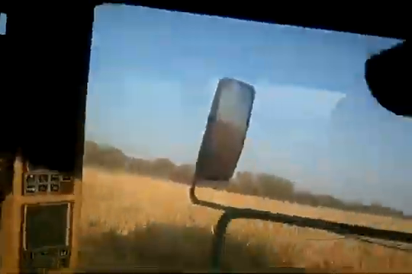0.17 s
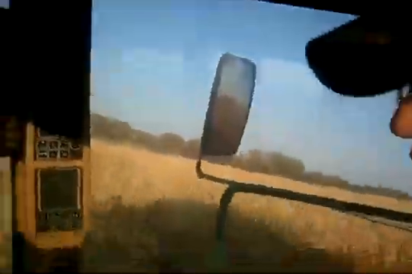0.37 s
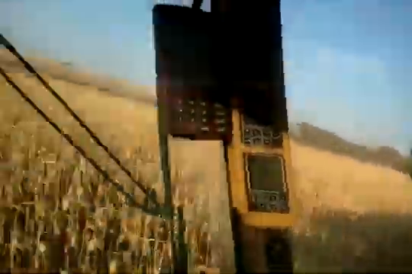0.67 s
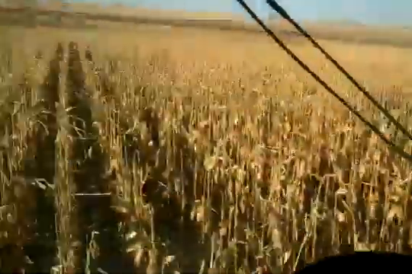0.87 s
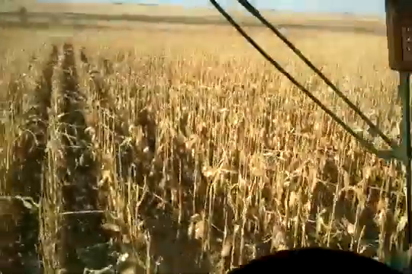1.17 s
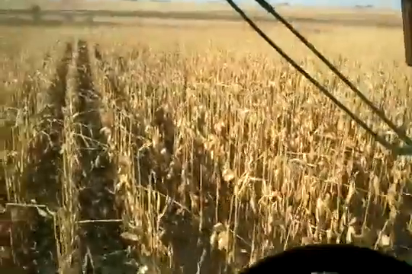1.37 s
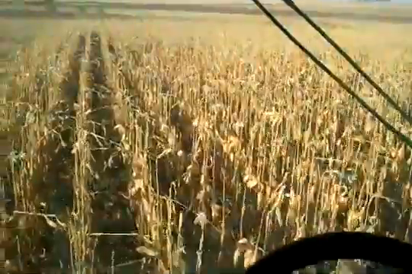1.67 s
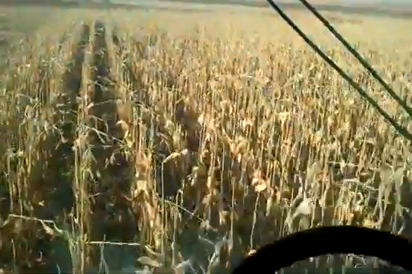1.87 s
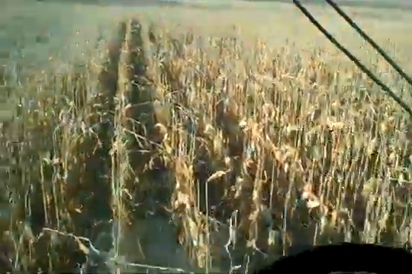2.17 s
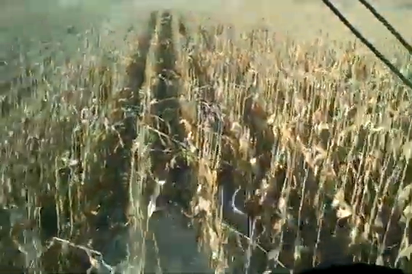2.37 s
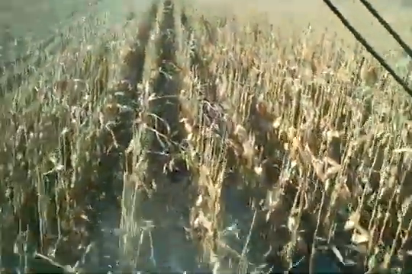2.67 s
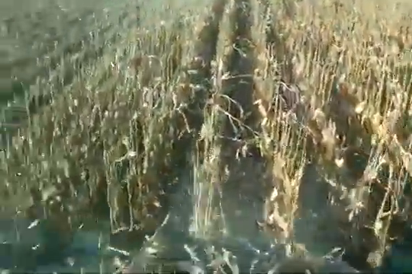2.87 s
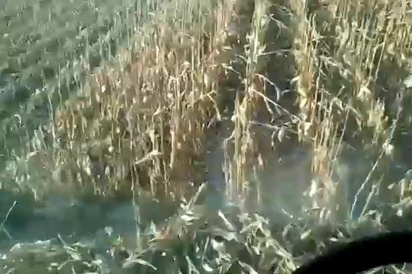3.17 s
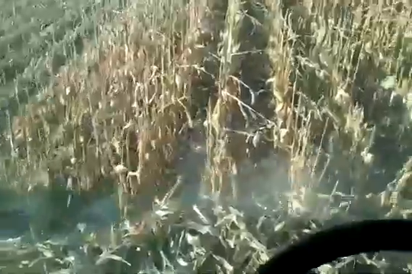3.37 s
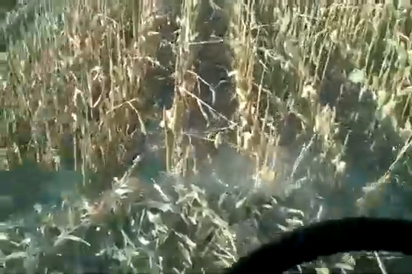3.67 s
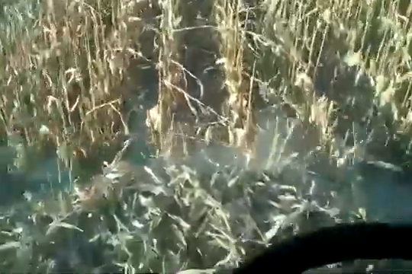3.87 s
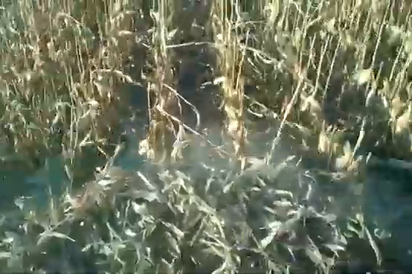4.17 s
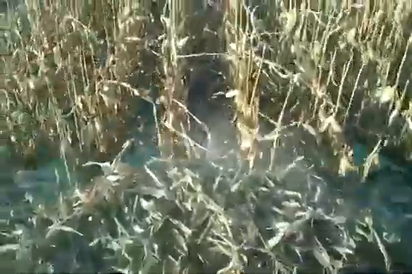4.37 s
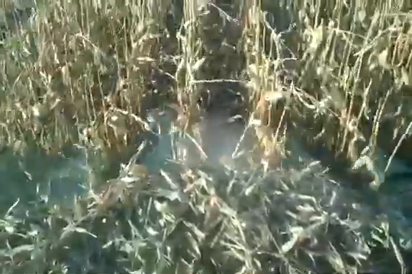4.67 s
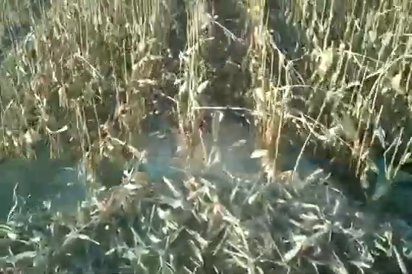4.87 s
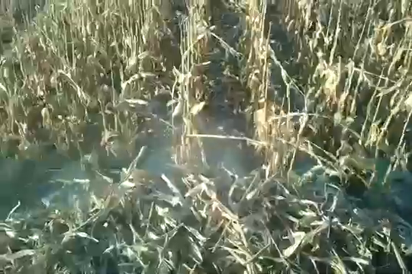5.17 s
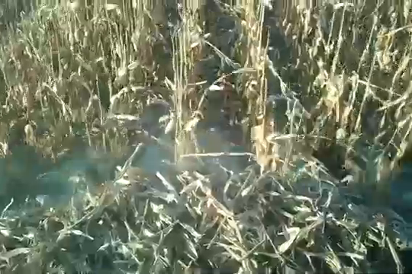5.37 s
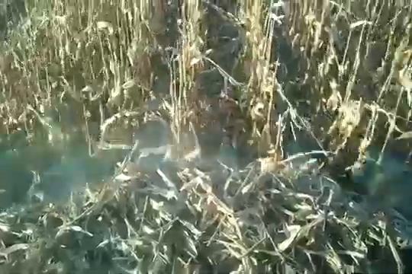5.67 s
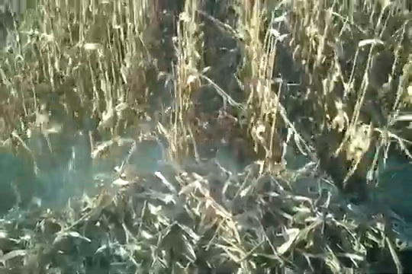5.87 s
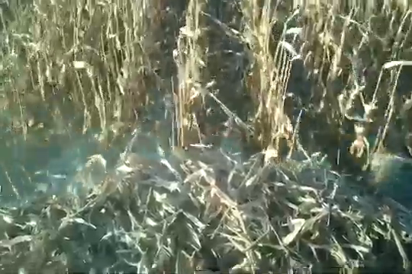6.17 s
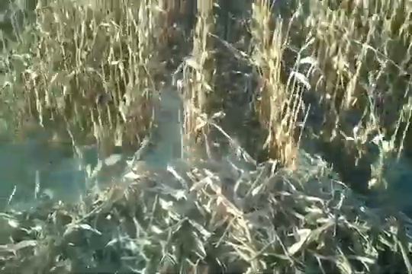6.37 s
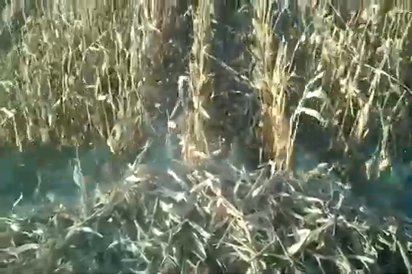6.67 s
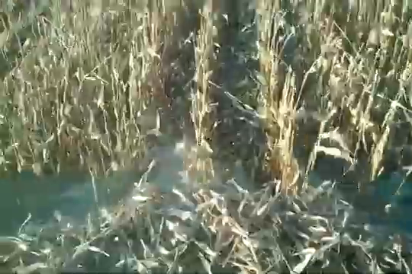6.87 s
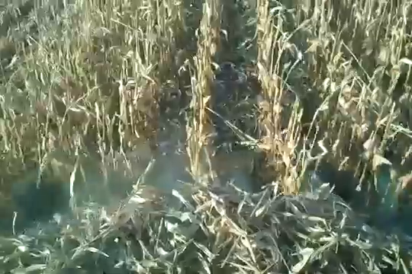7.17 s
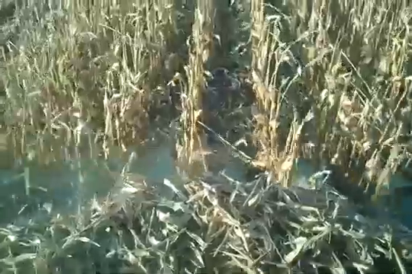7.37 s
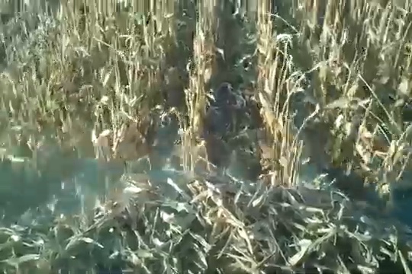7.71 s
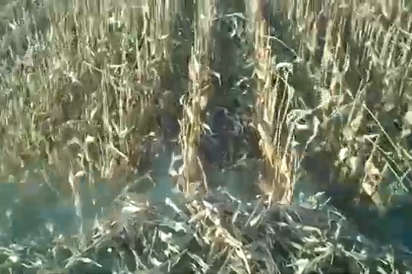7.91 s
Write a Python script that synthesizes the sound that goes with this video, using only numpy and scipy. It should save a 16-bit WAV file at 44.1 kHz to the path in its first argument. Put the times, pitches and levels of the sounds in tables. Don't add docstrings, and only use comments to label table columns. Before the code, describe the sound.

Continuous loud machine noise in a closed harvester cab: low panel boom, rough engine hum near 100 hertz, a mid hum around 500 hertz and a thin higher whine. Over it lies a grainy rush of dry stalks. The whine eases after the first second as the small camera tips to the header; later, strong low shakes pulse and briefly press the rest down.

```python
import sys
import numpy as np
from scipy import signal
from scipy.io import wavfile
from scipy.ndimage import uniform_filter1d, minimum_filter1d

SR = 44100
rng = np.random.default_rng(int(sys.argv[2]) if len(sys.argv) > 2 else 0)


def master_out(mix):
    frames = np.transpose(np.atleast_2d(mix))
    ceiling = np.clip(frames, -1, 1)
    pcm = np.round(ceiling * 32767).astype(np.int16)
    wavfile.write(sys.argv[1], SR, pcm)


def decibels_to_gain(level_db):
    exponent = np.asarray(level_db, float) / 20
    return 10 ** exponent


N = 354652

# (time [s], frequency [Hz])
CRANK = [(0.0, 515.7), (.7, 515.9), (1.2, 515.4), (2.4, 516.8), (4.5, 516.8), (5.2, 516.3), (6.2, 517.0),
         (8.04, 516.8)]
LINES_DUCK = 0.21


def engine(t):
    # (side window [dB], across cab [dB], header [dB], held low [dB])
    top_order_db = (-29.5, -26, -31.5, -33.5)
    # (multiple of crank speed [-], side window level [dB], crop level [dB])
    orders = [(2, -32, -31), (10, -36, -39), (15, -36, -38), (20, -42, -50), (25, -45, -45), (80, -50, -50)]
    rotor_hz, rotor_db, rotor_give = 25.7, -21, 0.54
    top_hz = along(CRANK, t)[0]
    crank_hz = top_hz / 16
    facing = facing_crop(t)
    top_db = gazed(top_order_db, t) + ducked(LINES_DUCK, t)
    out = tone(top_hz, top_db, t, rough_db=1.6, rough_hz=20)
    out += tone(crank_hz, shake_db(t) + 1.6, t, rough_db=0.3, rough_hz=5.8)
    out += tone(rotor_hz, rotor_db + ducked(rotor_give, t), t, rough_db=3.0, rough_hz=5.1)
    for order, side_db, crop_db in orders:
        level_db = side_db + facing * (crop_db - side_db)
        out += tone(order * crank_hz, level_db, t, rough_db=2.5, rough_hz=8)
    return out


def firing(t):
    # (centre [Hz], width [Hz], side window level [dB], crop level [dB])
    firing_bands = [(104.84, 5, -3, 0.5), (117.5, 4.7, -1, -1.5)]
    # (middle [s], half length [s], rise [dB])
    throbs = [(1.3, 0.11, 3.5), (1.62, .1, 5), (2.08, .1, 5), (3.45, .17, 6), (4.05, .17, 5),
              (5.25, 0.097, 4.5), (6.2, .15, 3.5), (6.5, .08, 3), (7.0, .06, 4.5), (7.25, .07, 5)]
    level_db = gazed((-21, -20, -22, -24.5), t) + bells(throbs, t) - 3.0
    return decibels_to_gain(level_db) * resonances(firing_bands, t)


def whines(t):
    # (full-speed pitch [Hz], share of crank sag [-], then level per gaze: side window [dB],
    # across cab [dB], header [dB], held low [dB])
    teeth = [
        (393.3, 1.0, -27.5, -24, -34, -37),
        (1438, 2.5, -33.5, -31, -34, -37),
        (2311, 0.299, -40.5, -44.5, -35, -38.5),
    ]
    # (middle [s], half length [s], change [dB])
    pump_sags = [(0.119, .15, -5), (.75, .22, -7.5), (1.6, .07, -6.5), (2.1, .14, -8), (3.55, .1, -4.5)]
    pump, full_speed_hz, jitter_share = 1, 516.8, 0.0005
    sag = along(CRANK, t)[0] / full_speed_hz - 1
    out = 0
    for k, (hz, slip, *db) in enumerate(teeth):
        jitter = jitter_share * slip * np.interp(t, t[::64], wander(12, t[::64]))
        level_db = gazed(db, t) + ducked(LINES_DUCK, t)
        if k == pump:
            level_db = level_db + bells(pump_sags, t)
        out = out + tone(hz * (1 + slip * sag + jitter), level_db, t, rough_db=2.0, rough_hz=29.8)
    return out


def panel_hums(t):
    # (centre [Hz], width [Hz], side window level [dB], crop level [dB])
    hum_bands = [(47, 6, -27, -27), (148, 4, -32, -40), (236, 22, -38, -28), (248, 2, -34, -33),
                 (273, 8, -34, -40), (401, 16, -31, -37), (409, 1.5, -32, -37), (495, 20, -38, -36),
                 (615, 1.5, -52, -43), (845, 30, -41, -39), (1053, 2, -54, -46), (1155, 2, -54, -46),
                 (2256, 3, -49, -54), (2487, 3, -57, -49), (2641.5, 1.5, -45, -46)]
    return resonances(hum_bands, t)


def boom(t):
    # (frequency [Hz], level per Hz [dB])
    boom_spectra = [
        [(14, -31.5), (23, -0.5), (75, -7), (123, -6), (195, -13), (338, -19), (392, -18), (448, -21),
         (512, -17), (577, -26), (800, -34), (1040, -57), (1760, -120)],
        [(14, -26), (23, 1.5), (54, -6.5), (163, -14), (240, -13.5), (343, -20), (392, -19.5), (442, -21.5),
         (505, -22), (640, -33.5), (800, -32.5), (1040, -50), (1760, -120)],
    ]
    noise = rng.standard_normal(N)
    drumming = coloured(noise, boom_spectra, size=4096, patchy_db=0.34, patch_hz=60, patch_s=0.13)
    drumming = signal.lfilter(*signal.iirnotch(32.3, 1.8, SR), drumming)
    level_db = gazed((-19.5, -18.5, -18.5, -19), t) + ducked(0.31, t) + 5.5
    return decibels_to_gain(level_db) * drumming


def rush(t):
    # (frequency [Hz], level per Hz [dB])
    rush_spectra = [
        [(320, -39.5), (550, -5.5), (846, -4.5), (922, -7), (1130, -4), (1260, -8), (1480, -7.5), (1860, -12),
         (2680, -10.5), (5820, -19), (7220, -32), (9390, -55.5), (15900, -120)],
        [(320, -38), (550, -6), (668, -0.5), (728, -9), (903, -1.5), (1140, -5.5), (1470, -5.5), (1510, -4.5),
         (2140, -13), (3470, -11.5), (6280, -20), (7220, -33.5), (9390, -67.5), (15900, -120)],
        [(320, -45.5), (550, -16), (626, 0), (760, -12.5), (828, -3.5), (1360, -9.5), (1480, -6.5),
         (2180, -13.5), (2380, -15), (2860, -23), (4210, -13), (7220, -34.5), (9390, -59.5), (15900, -120)],
        [(320, -36.5), (550, -0.5), (768, -5.5), (828, -2), (932, -4.5), (1220, -4), (1390, -2), (2160, -4.5),
         (2380, -5.5), (2890, -13.5), (3550, -19.5), (5760, -13), (6210, -16), (7220, -39), (9390, -76),
         (15900, -120)],
    ]
    beat_hz, snaps_per_s = 6.58, 1500
    snap_sizes = decibels_to_gain(3.6 * np.minimum(rng.exponential(1, N), 5))
    snaps = snap_sizes * (rng.random(N) < snaps_per_s / SR) * rng.choice([-1, 1], N)
    drive = 0.94 * rng.standard_normal(N) + 0.4 * evened(snaps)
    beat_db = -0.4 * np.cos(2 * np.pi * beat_hz * t)
    beat_db += 0.5 * np.interp(t, t[::64], wander(40, t[::64]))
    level_db = gazed((-31.5, -33, -31, -31.5), t) + ducked(0.28, t) + 7.5
    level_db = level_db + 1.96 * facing_crop(t) + beat_db
    return decibels_to_gain(level_db) * coloured(drive, rush_spectra, size=512, patchy_db=0.5, patch_hz=500, patch_s=0.047)


def shake_db(t):
    # (middle [s], half length [s], top level [dB])
    surges = [(.31, 0.26, -20.5), (.75, 0.058, -17.5), (1.06, 0.16, -22), (1.57, 0.13, -16),
              (2.0, 0.08, -14.5), (2.3, 0.04, -13.5), (2.68, 0.32, -17.5), (3.26, 0.22, -15.5),
              (3.93, 0.11, -16.5), (4.28, 0.083, -11.5), (4.65, .17, -17), (5.2, 0.27, -22.5),
              (5.78, .24, -15), (6.35, 0.14, -11), (7.03, 0.13, -10.5), (7.36, 0.12, -11), (7.8, .11, -16)]
    lull_db = -30
    powers = [(mid, half, decibels_to_gain(2 * db)) for mid, half, db in surges]
    return 10 * np.log10(decibels_to_gain(2 * lull_db) + bells(powers, t))


def ducked(share, t):
    shake_mean_db = -17
    return -share * (shake_db(t) - shake_mean_db)


def facing_crop(t):
    # (time [s], pose: 0 side window, 1 windscreen, 2 tipping down, 3 crop [-])
    poses = [(0, 0), (.8, -0.8), (1.05, 1.0), (2.15, 0.64), (2.35, 2), (2.75, 2.3), (3.0, 2.9), (4.0, 3.3)]
    return (along(poses, t)[0] / 3).clip(0, 1)


def gazed(db, t):
    # (time [s], gaze: 0 side window, 1 across cab, 2 tipped to header, 3 held low [-])
    gazes = [(0, 0), (.7, 0.7), (1.2, 1.0), (2.2, 1.03), (3.8, 1.45), (4.6, 1.8), (6.3, 2.5), (7.4, 3.0),
             (8.04, 3)]
    return np.interp(along(gazes, t)[0], np.arange(len(db)), db)


def resonances(bands, t):
    facing, out = facing_crop(t), 0
    for hz, width_hz, side_db, crop_db in bands:
        r = np.exp(-np.pi * width_hz / SR)
        noise = rng.standard_normal(N) + 1j * rng.standard_normal(N)
        slow = signal.lfilter([1], [1, -2 * r, r * r], noise)
        ringing = evened((slow * np.exp(2j * np.pi * hz * t)).real)
        out = out + decibels_to_gain(side_db + facing * (crop_db - side_db)) * ringing
    return out


def tone(hz, db, t, rough_db, rough_hz):
    waver = np.interp(t, t[::64], wander(rough_hz, t[::64]))
    phase = 2 * np.pi * np.cumsum(hz * np.ones(N)) / SR
    return np.sqrt(2) * decibels_to_gain(db + rough_db * waver) * np.sin(phase)


def coloured(x, spectra, size, patchy_db, patch_hz, patch_s):
    overlap = size * 3 // 4
    hz, t, z = signal.stft(x, SR, nperseg=size, noverlap=overlap)
    gain = decibels_to_gain(posed(spectra, hz, t))
    patches = rng.standard_normal(z.T.shape).T
    patches = uniform_filter1d(patches, max(round(patch_hz / hz[1]), 1), axis=0)
    patches = evened(uniform_filter1d(patches, max(round(patch_s / t[1]), 1), axis=1))
    gain = gain / np.linalg.norm(gain, axis=0) * decibels_to_gain(patchy_db * patches)
    return evened(signal.istft(z * gain, SR, nperseg=size, noverlap=overlap)[1][:N])


def posed(spectra, hz, t):
    place = facing_crop(t) * (len(spectra) - 1)
    out = 0
    for k, spectrum in enumerate(spectra):
        knot_hz, knot_db = np.transpose(spectrum)
        shape_db = np.interp(np.log(hz + 1), np.log(knot_hz + 1), knot_db)
        out = out + np.outer(shape_db, (1 - abs(place - k)).clip(0))
    return out


def bells(rows, t):
    s = t[::64]
    return np.interp(t, s, sum(top * np.exp(-((s - mid) / half) ** 2) for mid, half, top in rows))


def wander(top_hz, t):
    rates_hz = np.geomspace(top_hz / 20, top_hz, 16)
    return evened(sum(np.sin(2 * np.pi * (f * t + rng.random())) / np.sqrt(f) for f in rates_hz))


def along(rows, t):
    s, *columns = np.transpose(rows)
    return [np.interp(t, s, c) for c in columns]


def evened(x):
    return x / np.sqrt(np.mean(np.abs(x) ** 2) + 1e-20)


def scene():
    t = np.arange(N) / SR
    return (engine(t) + firing(t) + whines(t) + panel_hums(t) + boom(t) + rush(t))[None]


def hopping_treble(x, coarse_db):
    edge_choices_hz = [7200, 6980, 7060, 7220, 6950, 7280]
    hz, t, z = signal.stft(x, SR, nperseg=2048)
    edge_hz = np.repeat(rng.choice(edge_choices_hz, len(t)), 2)[:len(t)]
    treble = (hz[:, None] / 3000).clip(0, 1)
    uneven_db = coarse_db * treble * rng.standard_normal(z.T.shape).T
    return signal.istft(z * decibels_to_gain(uneven_db) * (hz[:, None] < edge_hz), SR, nperseg=2048)[1][:N]


def limiter(x, look_s, back_db_s):
    # (time [s], peak level [dB])
    step_ticks = [(0.243, -52), (0.421, -43.5), (0.4583, -53.5), (0.975, -47.5), (1.4534, -52.5),
                  (1.5817, -47.5), (2.415, -46), (3.507, -41), (3.941, -46), (4.0652, -46.5), (4.0903, -43),
                  (4.5933, -45), (4.864, -44.5), (5.178, -47), (5.4055, -48), (5.618, -48.5),
                  (5.827, -43.5), (5.859, -50.5), (6.0082, -41.5), (6.1135, -48.5), (6.7475, -51),
                  (6.947, -49), (7.1522, -44.5), (7.233, -46.5), (7.2602, -43), (7.4136, -53), (7.639, -50),
                  (7.7227, -49), (7.8436, -53.5), (7.987, -47)]
    ceiling, tick_db, tick_share = 0.709, -59, 0.73
    over_db = 20 * np.log10(np.maximum(abs(x) / ceiling, 1))
    back_db = np.arange(N) * back_db_s / SR
    look = 2 * round(look_s * SR / 2) + 1
    held_db = (np.maximum.accumulate(over_db + back_db) - back_db).clip(0)
    held_db = -minimum_filter1d(-held_db, 2 * look)
    glide_db = uniform_filter1d(uniform_filter1d(held_db, look), look)
    ticks = np.zeros(N)
    tick_s, peak_db = np.transpose(step_ticks)
    ticks[(tick_s * SR).astype(int)] = decibels_to_gain(peak_db + 8.0)
    bites = signal.find_peaks(over_db, distance=900)[0]
    bite_amp = decibels_to_gain(tick_db + 3.0 * rng.standard_normal(N)[bites])
    ticks[bites] += bite_amp * over_db[bites] * (rng.random(N)[bites] < tick_share)
    ticks = signal.lfilter([1, 0.14, -0.45, 0.18, 0.27, 0.19, 0, -0.27, 0.13, -0.69], 1, ticks)
    return x / decibels_to_gain(glide_db) + ticks


def top_cut(x):
    return signal.sosfilt(signal.butter(12, 15830, fs=SR, output="sos"), x)


def record(dry):
    offset = -0.185
    captured = hopping_treble(dry[0], coarse_db=2.5) + offset
    held = limiter(captured, look_s=0.0005, back_db_s=150)
    return top_cut(held[None])


dry = scene()
out = record(dry)
master_out(out)
```